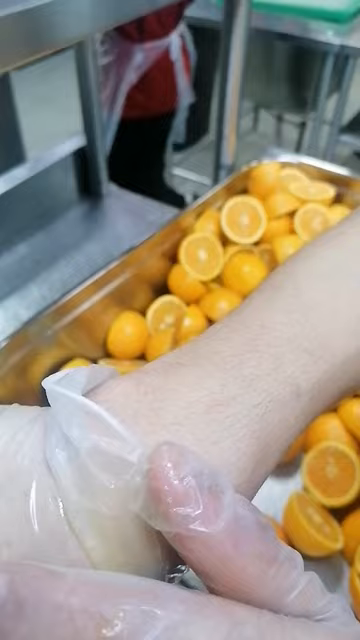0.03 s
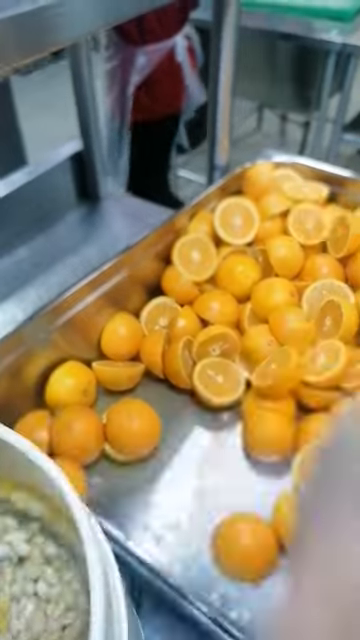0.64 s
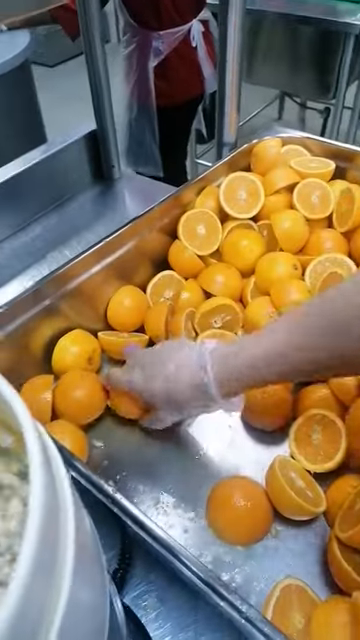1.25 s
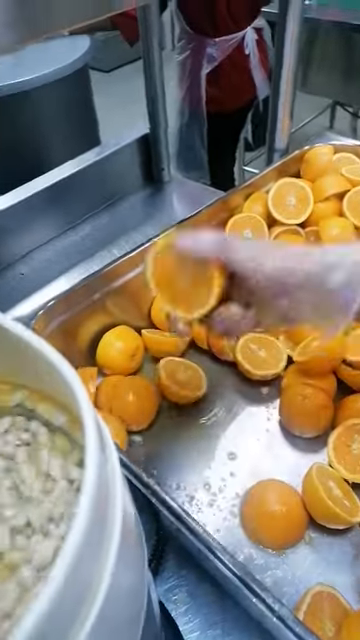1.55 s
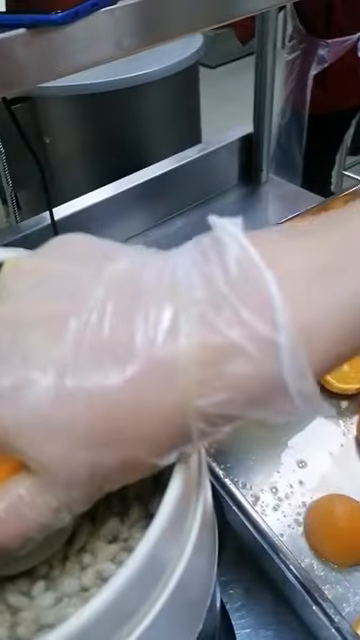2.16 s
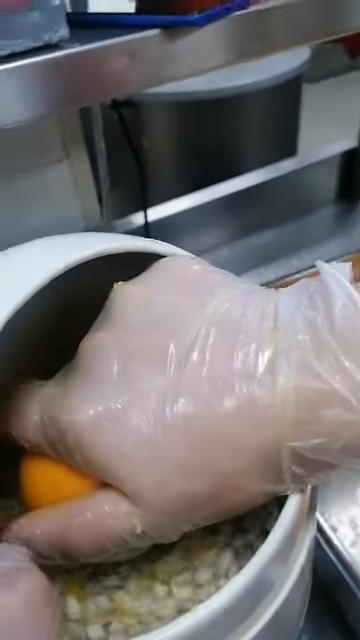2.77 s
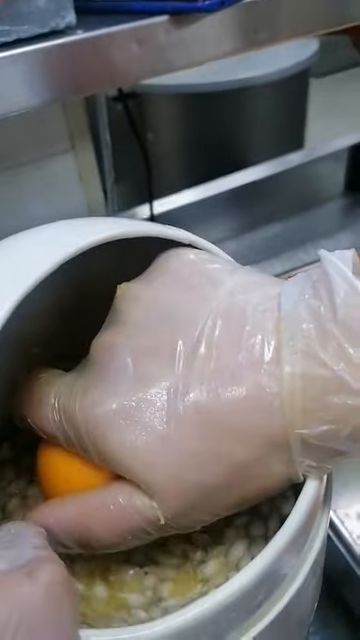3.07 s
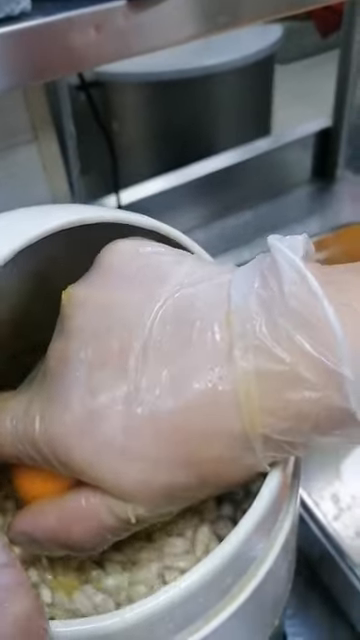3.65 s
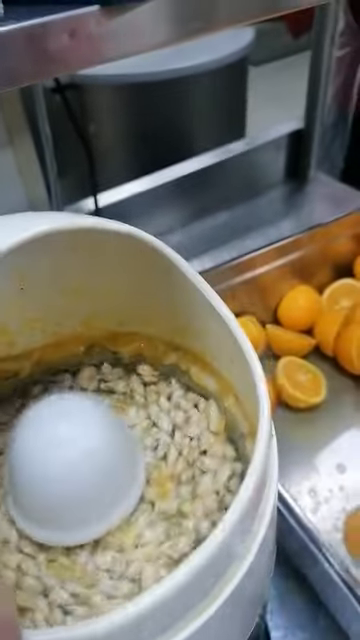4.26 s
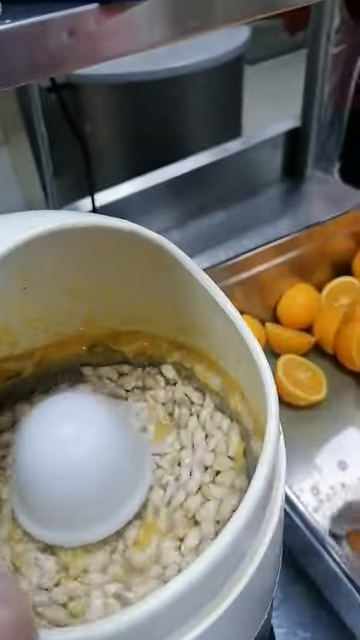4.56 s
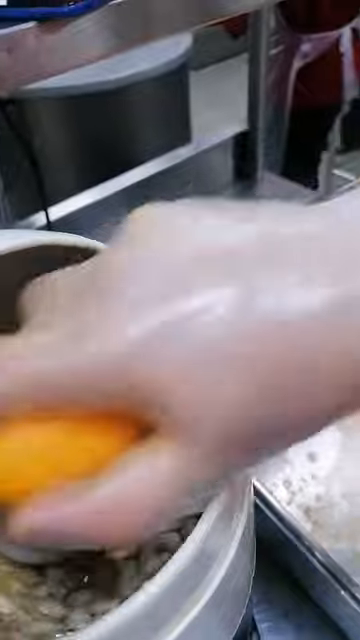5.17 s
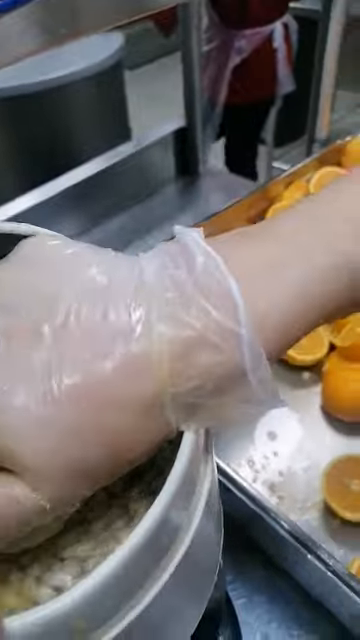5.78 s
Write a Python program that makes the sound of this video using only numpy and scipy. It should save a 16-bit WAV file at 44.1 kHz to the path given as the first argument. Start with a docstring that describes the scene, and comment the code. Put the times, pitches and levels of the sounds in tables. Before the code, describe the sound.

An electric citrus juicer starts with a clack, then drones and rattles as orange halves are pressed on with a wet fizz.

```python
"""A kitchen: an electric citrus juicer is switched on, its reamer turning about 15 times a second.
The worn drive drones in the plastic housing and knocks six times a turn, ringing bowl and panels.
Twice an orange half is pressed on: the speed sags, the resonances sink and wet pulp fizzes on the ribs.
Underneath lie mains hum and body rumble; the reamer snatches with hard clacks; tiles add a short tail."""
import sys
import numpy as np
from scipy import signal
from scipy.fft import rfft, irfft
from scipy.io import wavfile
from scipy.ndimage import uniform_filter1d

SR = 44100
rng = np.random.default_rng(int(sys.argv[2]) if len(sys.argv) > 2 else 0)


def master_out(mix):
    """Clip the mix to full scale and print it as 16-bit PCM to the path in sys.argv[1]."""
    frames = np.transpose(np.atleast_2d(mix))
    ceiling = np.clip(frames, -1, 1)
    pcm = np.round(ceiling * 32767).astype(np.int16)
    wavfile.write(sys.argv[1], SR, pcm)


N = 261072
T = np.arange(N) / SR
HZ = np.fft.rfftfreq(N, 1 / SR)
SWITCH_ON_S = .5595

# drive levels: time_s, drone_db, rattle_db, rumble_db
DRIVE_LEVELS = [(0.58, -29.5, -27.5, -45), (1.15, -27.5, -27, -45.5), (1.4, -23.5, -23.5, -41.5),
                (2.0, -21, -22, -38.5), (2.2, -25, -24.5, -38), (2.35, -21.5, -25, -39.5),
                (2.63, -23, -24, -43.5), (2.9, -32, -29, -44), (3.18, -19.5, -22.5, -44),
                (3.65, -19.5, -20.5, -45.5), (3.89, -21.5, -17, -44.5), (4.05, -24.5, -27.5, -41),
                (4.22, -23, -24.5, -42), (5.2, -22.5, -25, -41), (5.65, -26.5, -26, -43),
                (5.9, -24, -31, -43.5)]
# orange half on the reamer: touch_s, lift_s
PRESS_TIMES = [(2.29, 3.974), (5.508, 7.0)]


def gain_of(db):
    """Decibels to amplitude."""
    return 10 ** (np.asarray(db) / 20)


def unit_rms(x):
    """Scale to rms 1."""
    return x / np.sqrt(np.mean(x ** 2) + 1e-20)


def steadied(pair):
    """Hold stereo power near 1, averaged over about four turns."""
    return pair / np.sqrt(uniform_filter1d((pair ** 2).mean(0), size=12000) + 1e-12)


def curve(rows, column=1):
    """Time-table column at every sample."""
    rows = np.array(rows)
    return np.interp(T, rows[:, 0], rows[:, column])


def per_bin(rows, column=1):
    """Frequency-table column at every FFT bin."""
    rows = np.array(rows)
    return np.interp(np.log(HZ + 1), np.log(rows[:, 0]), rows[:, column])


def colour(x, spectrum, column=1):
    """Filter by a table of freq_hz, gain_db."""
    return irfft(rfft(x) * gain_of(per_bin(spectrum, column)), N)


def wander(rate_hz):
    """Random drift of rms 1, rolling off above rate_hz."""
    return unit_rms(irfft(rfft(rng.standard_normal(N)) * np.exp(-(HZ / rate_hz) ** 2), N))


def resonate(x, hz, width_hz):
    """Unity-gain resonance at a fixed or moving pitch."""
    spin = np.exp(2j * np.pi * np.cumsum(np.broadcast_to(hz, N)) / SR)
    pole = np.exp(-np.pi * width_hz / SR)
    return 2 * (spin * signal.lfilter([1 - pole], [1, -pole], x * spin.conj() + 1e-18)).real


def stereo(pair):
    """Mix two unrelated signals into a partly coherent left and right."""
    # stereo image: freq_hz, coherence, left_lead_rad, left_minus_right_db
    image = [(30, 0.7, 0, 0), (109, 1, 1, -2), (585, 0.74, -1.5, -2.5), (1120, 0.75, 1, -3.5),
             (1360, 0.7, 1, -5.5), (2090, 0.72, 1, -3), (4840, 0.22, 3, 1), (8000, 0.5, 14.5, 6.5),
             (11500, 0.2, 14.5, 0.5)]
    left, other = rfft(pair)
    coherence = np.clip(per_bin(image), 0, 1)
    right = (coherence * left + np.sqrt(1 - coherence ** 2) * other) * np.exp(-1j * per_bin(image, 2))
    lean = gain_of(per_bin(image, 3) / 2)
    return irfft(np.array([left * lean, right / lean]), N)


def grains(per_s, spread_db):
    """Tiny random clicks of unequal size, in stereo."""
    size = gain_of(spread_db * np.minimum(rng.exponential(1, (2, N)), 4))
    return unit_rms(stereo(size * rng.standard_normal((2, N)) * (rng.random((2, N)) < per_s / SR)))


def envelope(start_s, end_s, rise_s, release_s):
    """Linear rise, hold, exponential release; 0-1."""
    return np.clip((T - start_s) / rise_s, 0, 1) * np.exp(-np.maximum(T - end_s, 0) / release_s)


def pressing(rise_s, release_s):
    """Both presses as one control, 0-1."""
    return np.max([envelope(*times, rise_s, release_s) for times in PRESS_TIMES], axis=0)


def seating(free=0.28, rise_s=0.94, linger=0.4):
    """The hand seats the shaft (0 rocking, 1 firm); it springs partly free, then works loose."""
    held = (1 - linger) * pressing(rise_s, release_s=0.3) + linger * pressing(rise_s, release_s=1.73)
    return np.clip(free + (1 - free) * held, 0, 1)


def kitchen(x, t60_s=0.14, wet_db=-7, size=16000):
    """Steel benches and tiled walls add a short, diffuse tail."""
    t = np.arange(size) / SR
    taps = rng.standard_normal((2, size)) * (rng.random((2, size)) < .06)
    taps *= (t > .004) * gain_of(-60 * t / t60_s)
    taps /= np.linalg.norm(taps, axis=1, keepdims=True)
    return x + gain_of(wet_db) * signal.fftconvolve(x, taps, axes=1)[:, :N]


def hum(pitch_hz=120, idle_db=-53, work_db=14):
    """The motor's mains hum grows under work and settles slowly."""
    level_db = idle_db + work_db * pressing(rise_s=3, release_s=4.1)
    return gain_of(level_db) * np.sqrt(2) * np.sin(2 * np.pi * pitch_hz * T)


def whir(force, level_db=-50):
    """The motor whirs with fine, dense ticks, slightly more at each knock."""
    # motor whir: freq_hz, gain_db
    spectrum = [(1500, -15), (3500, 16.5), (5500, 6), (8000, 2), (10000, 1), (12500, -16), (15000, -41)]
    ticks = grains(per_s=14000, spread_db=1.6)
    return gain_of(level_db) * unit_rms(colour(ticks * force ** 0.042, spectrum))


def rumble(gears, turns, seated, noise_db=6, waver_db=3, swell=0.16, quiet_db=-42):
    """The body shakes on the bench: wavering shaft tones, and gear noise that swells faster than they."""
    # shaking body: freq_hz, gain_db
    spectrum = [(20, -3), (45, 3.5), (90, 7.5), (170, 6), (260, -9.5), (340, 5.5), (500, -18), (900, 6.5),
                (3000, -33)]
    # shaft tones relative to the rumble level: speed_multiple, free_db, held_db
    shaft_tones = [(7, -19, -17), (8, 4, -1.5), (10, -4, -21.5), (11, 6, -13), (12, -3.5, -9),
                   (14, -26, -0.5), (16, -16, 2.5), (20, 6.5, -32)]
    level_db = curve(DRIVE_LEVELS, 3)
    shake = gain_of(noise_db + swell * (level_db - quiet_db)) * unit_rms(colour(gears, spectrum))
    for multiple, free_db, held_db in shaft_tones:
        tone_db = free_db + seated * (held_db - free_db) + waver_db * wander(25)
        shake += gain_of(tone_db) * np.sin(2 * np.pi * (multiple * turns + rng.random()))
    return shake * gain_of(level_db)


def buzzing(push, width_hz=420, left_db=-1, right_db=1):
    """The loose housing chatters with the knocks in short swells, each at its own pitch."""
    # swells: centre_s, sigma_s, pitch_hz, level_db
    swells = [(1.421, 0.12, 2325, -31.5), (1.8, 0.18, 647, -35), (2.05, 0.48, 2620, -44.5),
              (3.803, 0.22, 2000, -31), (4.9, 0.41, 1980, -36.5), (5.502, 0.073, 2600, -39)]
    sound = 0
    for centre_s, sigma_s, pitch_hz, level_db in swells:
        b, a = signal.iirpeak(pitch_hz, pitch_hz / width_hz, fs=SR)
        ring = unit_rms(signal.lfilter(b, a, signal.lfilter(b, a, push)))
        sound += ring * gain_of(level_db) * np.exp(-((T - centre_s) / sigma_s) ** 2 / 2)
    return sound * gain_of([[left_db], [right_db]])


def squeeze(touch_s, lift_s, scrape_db=-38, pith_db=11.5, pith_after_s=1.143, pith_width_s=0.23):
    """Fizz and scrape gains for one half; the scrape peaks as the ribs reach the pith."""
    # fizzing juice: time_s, level_db
    juice = [(2.3, -37), (2.41, -33.5), (2.47, -37), (2.64, -33.5), (2.72, -30.5), (2.84, -32.5),
             (3.05, -30), (3.17, -29), (3.26, -26.5), (3.42, -31), (3.62, -32.5), (3.75, -37),
             (5.67, -38.5), (5.92, -29)]
    pith = np.exp(-((T - touch_s - pith_after_s) / pith_width_s) ** 2)
    contact = envelope(touch_s, lift_s, rise_s=0.091, release_s=.07)
    return gain_of([curve(juice), scrape_db + pith_db * pith]) * contact


def pulp(turns, force, fizz_db=-1.73, rasp_db=0.6, groan_db=-8, groan_multiple=16, flicker_db=1.57):
    """The ribs burst juice cells and scrape the pith in step with the knocks, setting off a low groan."""
    # bursting cells: freq_hz, gain_db
    cell_spectrum = [(1500, -30), (3500, -21), (4700, -1), (5700, 7), (7000, 2.5), (8800, 2.5), (10500, -4),
                     (12500, -12), (15000, -24)]
    # scraped pith: freq_hz, gain_db
    pith_spectrum = [(700, -1), (1500, 6), (3700, 5), (4500, -1), (5500, -2.5), (7000, -48), (12000, -23)]
    fizz, scrape = sum(squeeze(*times) for times in PRESS_TIMES)
    cells = unit_rms(colour(grains(per_s=14000, spread_db=2), cell_spectrum))
    rasp = unit_rms(colour(grains(per_s=6000, spread_db=0.63) * force ** 0.37, pith_spectrum))
    wet = gain_of(fizz_db) * fizz * cells + gain_of(rasp_db) * scrape * rasp
    groan = np.sin(2 * np.pi * (groan_multiple * turns + 0.1 * wander(17)))
    groan *= gain_of(groan_db) * scrape ** 2 / scrape.max()
    return wet * gain_of(flicker_db * wander(220)) + groan


def clacks(rise_s=0.00062, ring_hz=(1100, 2020), width_hz=110, ring_db=3):
    """Hard blows of plastic on plastic leave the bowl ringing."""
    # the start, the reamer snatching, and the loudest single knocks: peak_s, level_db, decay_s
    hits = [(0.5627, -17, 0.0014), (.597, -22.5, .003), (0.762, -24.5, 0.0034), (.831, -29, 0.0028),
            (1.615, -17, 0.0031), (1.751, -22, 0.0026), (2.153, -16, 0.0026), (2.217, -31, 0.0029),
            (2.755, -19.5, 0.0027), (2.79, -26, .003), (2.822, -23, .003), (3.095, -22, .003),
            (3.523, -20, 0.0022), (3.590, -15.5, 0.0026), (3.775, -15, 0.0037), (3.930, -14, 0.0047),
            (4.25, -16.5, 0.0033), (4.282, -18, 0.0036), (4.317, -26.5, 0.003), (4.383, -20, 0.0046),
            (4.452, -15, 0.0024)]
    # one clack: freq_hz, gain_db
    spectrum = [(100, -11.5), (450, 1.5), (700, -6), (1080, 5.5), (1450, -6), (2000, 5.5), (3000, -3.5),
                (5000, -21), (9000, -29.5), (15000, -53)]
    noise = unit_rms(colour(stereo(rng.standard_normal((2, N))), spectrum))
    blows = noise * sum(gain_of(level_db) * envelope(peak_s - rise_s, peak_s, rise_s, decay_s)
                        for peak_s, level_db, decay_s in hits)
    return blows + gain_of(ring_db) * sum(resonate(blows, hz, width_hz) for hz in ring_hz)


def gear_noise(turns, seated, size=2048):
    """The rough gear track repeats every turn; rocking flips its sign each half turn."""
    # repeating part of the noise: freq_hz, power_share
    repeating = [(60, 0.033), (380, 0.79), (540, 0.98), (1000, 0.6), (2000, 0.19), (4000, 0.058)]
    tracks = irfft(np.exp(2j * np.pi * rng.random((2, size // 2 + 1))))
    places = np.arange(size) / size
    now = np.array([np.interp(turns % 1, places, track) for track in tracks])
    opposite = np.array([np.interp((turns + .5) % 1, places, track) for track in tracks])
    # held: even multiples of the speed; rocking: odd ones
    mix_rad = np.pi / 2 * np.clip((seated - .2) / 0.77, .15, 1)
    locked = unit_rms(np.sin(mix_rad) * (now + opposite) + np.cos(mix_rad) * (now - opposite))
    share = np.clip(per_bin(repeating), 0, 1)
    fresh = rng.standard_normal((2, N))
    return stereo(irfft(rfft(locked) * np.sqrt(share) + rfft(fresh) * np.sqrt(1 - share), N))


def knocking(turns, seated, free_rise_turns=0.05, held_rise_turns=0.061, slack_turns=0.0051,
             drift_db=1.0, uneven_db=1.94, floor_db=-12, strike_db=-17, cutoff_hz=2800, settle_s=0.46):
    """Each knock is a hard strike and a short grinding force; two slip ever later under the hand."""
    # knocks of one turn: place_turns, slip_turns, decay_turns, start_db, free_db, held_db
    knocks = [(.1, .12, .06, -9, -3.5, 1), (0.221, 0, 0.053, 5.5, 4, -12), (0.449, -.01, 0.074, 4, 1, 1),
              (0.587, 0.15, 0.045, -17, -6, -0.5), (0.717, 0, 0.055, 3.5, -4.5, -3),
              (0.962, -.01, 0.093, -12.5, 2.5, 1)]
    starting = np.exp(-((T - SWITCH_ON_S) / settle_s) ** 4)
    slipped = pressing(rise_s=1.45, release_s=0.085) ** 2
    shaft_turns = turns + slack_turns * wander(37)
    rise_turns = free_rise_turns + seated ** 2 * (held_rise_turns - free_rise_turns)
    power, strikes = gain_of(floor_db) ** 2, 0
    for place_turns, slip_turns, decay_turns, start_db, free_db, held_db in knocks:
        knock_turns = shaft_turns - place_turns - slip_turns * slipped
        age_turns = (knock_turns + rise_turns) % 1
        level_db = free_db + starting * (start_db - free_db) + seated ** 2 * (held_db - free_db)
        strength = gain_of(level_db + drift_db * wander(4.8))
        attack = np.minimum(age_turns / rise_turns, 1)
        decay = np.exp(-np.maximum(age_turns - rise_turns, 0) / decay_turns)
        power += (strength * attack * decay) ** 2
        strikes += strength * (np.diff(np.floor(knock_turns), prepend=0) > 0)
    strikes = unit_rms(signal.sosfilt(signal.butter(2, cutoff_hz, fs=SR, output="sos"), strikes))
    # each strike scatters through the plastic
    scatter = rng.standard_normal(400) * np.exp(-np.arange(400) / SR / .0012)
    strikes = unit_rms(signal.fftconvolve(strikes, scatter)[:N])
    power /= uniform_filter1d(power, size=2956)  # the knocks share one turn's power
    force = np.sqrt(power) * gain_of(uneven_db * wander(93))
    return force, gain_of(strike_db) * stereo(np.array([strikes, np.zeros(N)]))


def rattle(push, seated, load, bowl_hz=1271, sag_hz=201, waver_hz=10,
           bowl_left_db=4, bowl_right_db=10.5, bowl_held_db=8, trim_db=-1.5):
    """The knocks ring bowl and panels; under the hand the bowl and the upper panel modes sink."""
    # knocking gears: freq_hz, free_db, held_db
    spectrum = [(50.07, -30, -53), (264, 2, -15), (470, -9.5, -0.5), (672, 3, -12), (840, -3, -9.5),
                (1340, -8, -13), (2320, -11, -12.5), (3100, -10.5, -17), (3700, -19, -15),
                (5860, -21.5, -28), (9380, -27.5, -44), (11800, -42.5, -62), (15000, -81, -68)]
    # panel modes: free_hz, held_hz, width_hz, left_db, right_db
    panels = [(780, 880, 190, -6.5, -41), (1546, 1600, 195, 10, -9), (2010, 1860, 174, 2.5, 14.5),
              (2178, 2150, 45, 14, 9.5), (2540, 2460, 300, 6.5, -11), (3470, 3250, 85, -11, 4.5)]
    blows = (1 - seated) * colour(push, spectrum) + seated * colour(push, spectrum, 2)
    pitch_hz = bowl_hz - sag_hz * (load + seated ** 2) / 2 + waver_hz * wander(11)
    bowl = resonate(blows, pitch_hz, width_hz=50) * gain_of(bowl_held_db * seated)
    sound = blows + gain_of([[bowl_left_db], [bowl_right_db]]) * bowl
    for free_hz, held_hz, width_hz, left_db, right_db in panels:
        ring = resonate(blows, free_hz + seated * (held_hz - free_hz), width_hz)
        sound += gain_of([[left_db], [right_db]]) * ring
    return steadied(sound) * gain_of(curve(DRIVE_LEVELS, 2) + trim_db)


def drone(gears, turns, width_hz=95, waver_hz=3, lid_hz=500, lid_db=-9, spread=0.066, uneven_db=0.44,
          throb_turns=(.255, .79), rise_turns=0.043, fall_turns=0.096,
          thump_turns=0.1709, thump_width_hz=45):
    """The gears make the housing purr and throb twice a turn; each catch of the ribs thumps it."""
    # housing mode, sinking under load: time_s, pitch_hz, first_throb_db, second_throb_db
    housing = [(.56, 415, -5, 3), (.9, 491, -7, -22), (1.4, 483, 17, -20), (2.0, 469, 29.5, 15),
               (2.25, 449, 25, 2), (2.42, 419, 16, 11), (2.65, 421, 12, 6), (2.92, 423, -5, 31),
               (3.15, 445, -1, 0), (3.42, 442.3, 8, 8), (3.85, 455, -6, 0), (4.07, 421, 0, 0),
               (4.3, 453, 1, 5), (4.8, 460, 11.5, 2), (5.25, 450.7, 7, 4), (5.6, 423, 8, 0),
               (5.92, 432, 26, 21)]
    # ribs catching in the fruit: time_s, lag_turns, thump_share
    grip = [(2.95, 0.0031, 0.1), (3.15, 0.034, .25), (3.24, -.05, 0.56), (3.31, -0.0466, 0.5),
            (3.37, 0.043, 0.8), (3.56, 0.074, .97), (3.61, .245, 0.7), (3.75, .255, 0.76),
            (3.84, 0.2364, 0.24), (3.97, 0.24, 0.53), (4.04, 0.083, .85), (4.16, 0.067, 0.86),
            (4.22, -0.056, 0.11)]
    pitch_hz = curve(housing) + waver_hz * wander(14)
    ring = steadied(resonate(resonate(gears, pitch_hz, width_hz), pitch_hz, width_hz))
    lid = steadied(resonate(resonate(gears, lid_hz, width_hz=35), lid_hz, width_hz))
    ring += gain_of(lid_db) * lid
    # close source, long waves: nearly mono
    ring = spread * ring + (1 - spread) * ring.mean(0)
    # the gears stay in mesh, evening out the swing
    ring /= (uniform_filter1d((ring ** 2).mean(0), size=450) + 1e-9) ** .47
    lagged_turns = turns - curve(grip)
    offsets = ((lagged_turns - place + .5) % 1 - .5 for place in throb_turns)
    first, second = (np.exp(-(d / np.where(d < 0, rise_turns, fall_turns)) ** 2) for d in offsets)
    throb_db = .5 * (first * curve(housing, 2) + second * curve(housing, 3))  # half the table's depth
    ring = steadied(ring * gain_of(throb_db))
    catches = np.diff(np.floor(2 * (lagged_turns - thump_turns)), prepend=0) > 0
    thumps = unit_rms(resonate(resonate(catches, pitch_hz, thump_width_hz), pitch_hz, thump_width_hz))
    share = np.clip(curve(grip, 2), 0, 1)
    sound = steadied(np.sqrt(1 - share) * ring + np.sqrt(share) * thumps)
    return sound * gain_of(curve(DRIVE_LEVELS) + uneven_db * wander(15))


def scene():
    """One shaft, loaded and seated by the presses, drives the juicer from switch-on."""
    # reamer speed: time_s, turns_per_s
    speed = [(0.548, 14.88), (1.25, 15.01), (1.8, 14.9), (2.6, 14.9), (3.0, 14.839), (3.3, 14.642),
             (3.6, 14.608), (3.9, 14.706), (4.3, 14.888), (4.7, 14.933), (5.3, 14.938), (5.92, 14.806)]
    turns = np.cumsum(curve(speed) * (T >= speed[0][0])) / SR
    running = np.clip((T - SWITCH_ON_S) / 0.0095, 0, 1)
    run_up = np.exp(-(np.maximum(T - SWITCH_ON_S, 0) / 0.17) ** 2)
    load = run_up + pressing(rise_s=0.019, release_s=0.48)
    seated = seating()
    gears = gear_noise(turns, seated)
    force, strikes = knocking(turns, seated)
    push = gears * force + strikes
    low = drone(gears, turns) + rumble(gears, turns, seated) + hum()
    high = rattle(push, seated, load) + buzzing(push) + whir(force) + pulp(turns, force)
    lean_db = 1.6 * seated  # further right under the hand
    return (running * low + kitchen(running * high + clacks())) * gain_of([-lean_db / 2, lean_db / 2])


def record(dry):
    """Low-pass at 15 kHz."""
    taps = signal.firwin(511, 15000, window=("kaiser", 9), fs=SR)
    return signal.oaconvolve(dry, taps[None], "same")


dry = scene()
out = record(dry)
master_out(out)
```